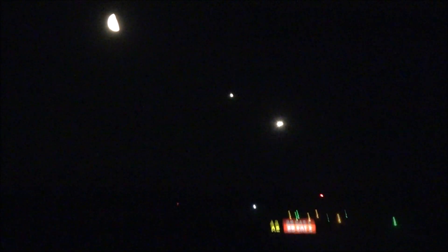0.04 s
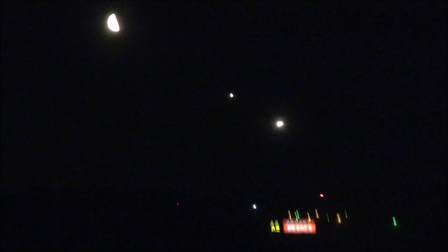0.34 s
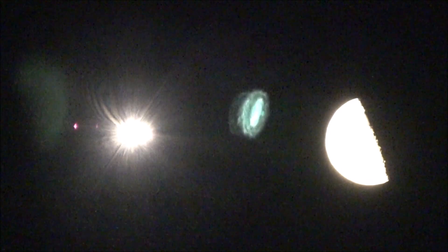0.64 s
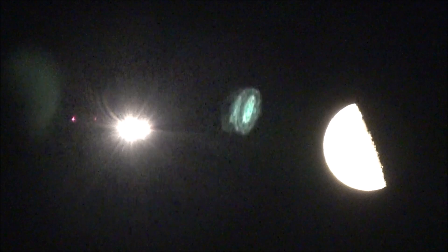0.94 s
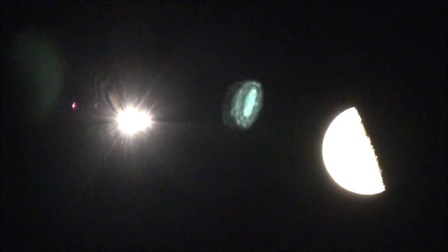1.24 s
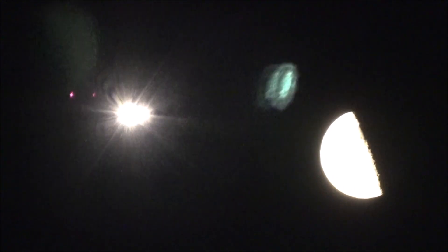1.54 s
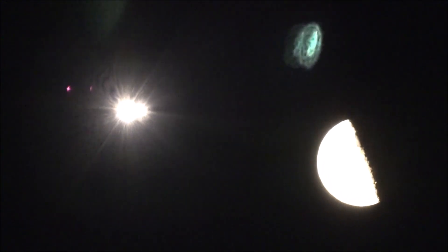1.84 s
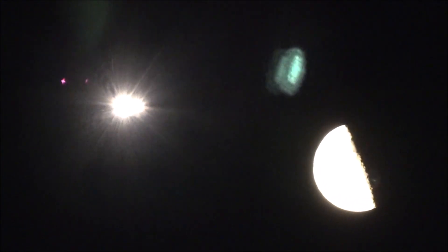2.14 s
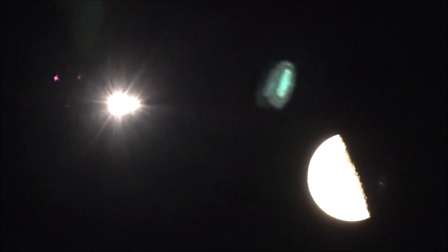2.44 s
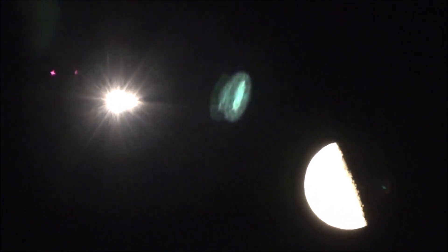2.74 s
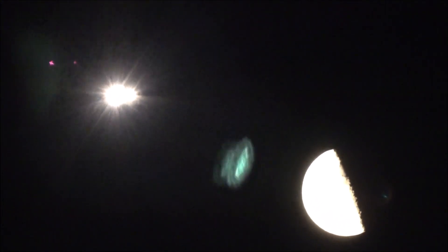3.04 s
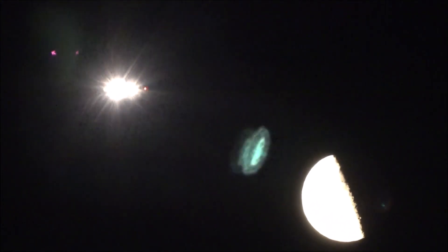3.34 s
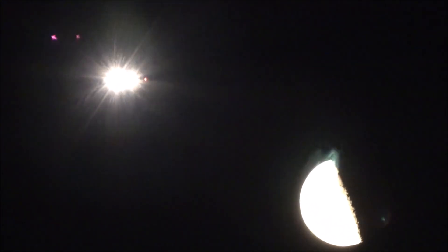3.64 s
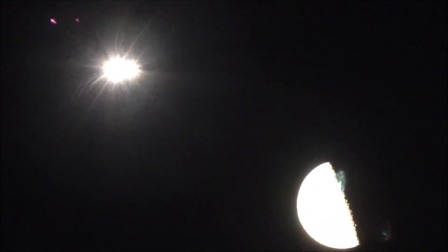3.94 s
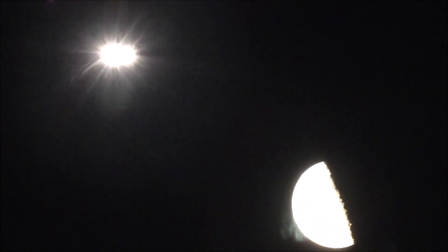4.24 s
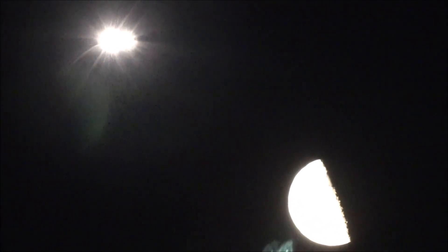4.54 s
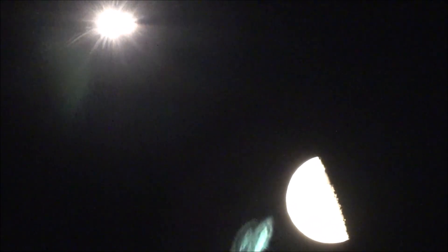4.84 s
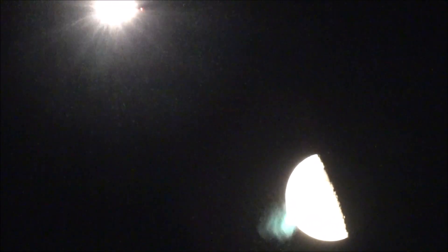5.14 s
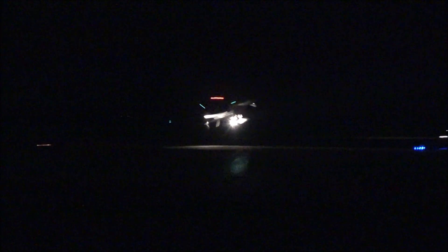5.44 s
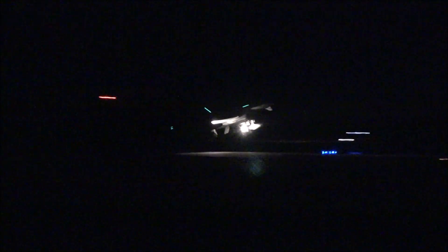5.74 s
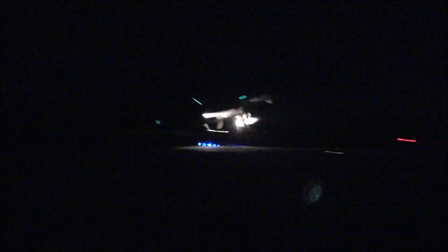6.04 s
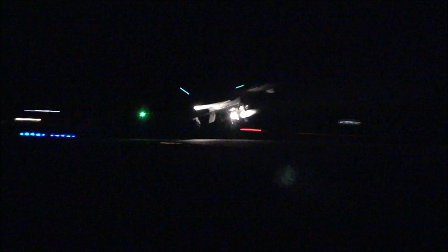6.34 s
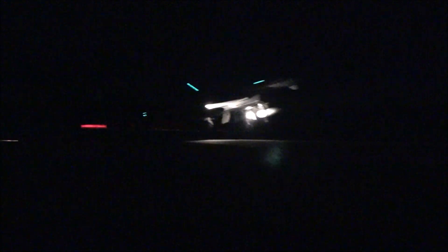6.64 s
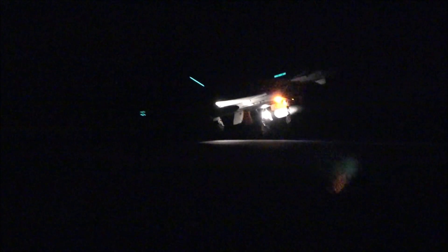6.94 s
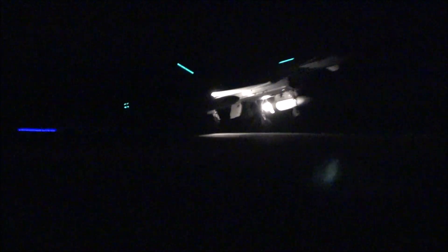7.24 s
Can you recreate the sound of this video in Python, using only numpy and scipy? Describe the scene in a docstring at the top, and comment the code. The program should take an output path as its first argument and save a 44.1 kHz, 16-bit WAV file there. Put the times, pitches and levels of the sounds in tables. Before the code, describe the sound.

A twin-engine fighter jet approaches and rolls past on a runway, its engines screaming with a high whine over rushing air.

```python
"""First comes an instant of far-off rumble, then silence: a twin-engine fighter is landing at night.
From beside the runway we then hear it approach, and jump to it rolling past. The intake fans scream
under a thin blade whine, the exhaust rumbles, and air rushing over the body roars and howls with a
slow beat. An echo off the ground sweeps notches (missing pitches) through the noise, and swirling
air makes the treble surge and flutter."""
import sys
import numpy as np
from scipy import signal
from scipy.fft import rfft, irfft, next_fast_len
from scipy.io import wavfile
from scipy.ndimage import uniform_filter1d, minimum_filter1d, map_coordinates

SR = 44100
rng = np.random.default_rng(int(sys.argv[2]) if len(sys.argv) > 2 else 0)


def master(y):
    """Save y as 16-bit WAV."""
    cut = np.clip(np.atleast_2d(y).T, -1, 1)
    pcm = np.round(cut * 32767)  # scale
    wavfile.write(sys.argv[1], SR, pcm.astype(np.int16))


N = 321048
WINDOW, HOP = 1024, 128  # noise is shaped in short overlapping frames: length, step [samples]
TIME = np.arange(N) / SR
FRAMES = np.arange(-(-N // HOP) + 1) * HOP / SR
HZ = np.fft.rfftfreq(WINDOW, 1 / SR)[:, None]
# when each part is heard (start [s], end [s])
FAR_SPAN, APPROACH_SPAN, ROLL_SPAN = (0, .139), (.4805, 5.285), (5.285, 7.4)

# Table levels are relative: the functions add their own gains.
# tone colour of the microphone hiss and of each jet noise (frequency [Hz], level [dB])
MIC_COLOUR = [(100, -3), (3000, 0), (6500, 0), (10000, -3), (13500, -4), (15000, -8), (16000, -16)]
FAR_COLOUR = [(25, -20), (50, -13), (110, 3), (165, -14), (260, 3.5), (420, -2), (800, -9), (1300, -12.5),
              (1900, -23), (2600, -36), (5000, -58)]
RUMBLE_COLOUR_APPROACH = [(20, -40.5), (45, -25.5), (70, -5.5), (105, 0), (160, 2), (210, -7), (280, -2),
                          (400, -13.5), (700, -29), (2000, -93)]
RUMBLE_COLOUR_ROLL = [(20, -34.5), (45, -16), (85, 5.5), (115, 1.5), (160, -3), (220, -21), (280, -12),
                      (420, -12.5), (700, -25), (2000, -83)]
ROAR_COLOUR_APPROACH = [(200, -27.5), (440, -13.5), (530, -1), (640, 1.5), (750, -1), (1000, -1),
                        (1450, 2.5), (1750, 1), (2300, -6.5), (3200, -35.5), (6000, -100)]
ROAR_COLOUR_ROLL = [(200, -16), (430, -5.5), (520, 2.5), (620, 4), (780, 1.5), (980, 0), (1300, 3.5),
                    (1800, 1.5), (3000, -29), (7000, -83)]
INTAKE_COLOUR_APPROACH = [(1200, -26.5), (2200, -1), (2600, 2.5), (3100, 1.5), (3600, 1), (4000, -7.5),
                          (4500, -12), (5000, -25), (5700, -35.5), (7000, -62), (9000, -110)]
INTAKE_COLOUR_ROLL = [(900, -28), (1800, -9), (2400, 6), (3100, 2.5), (3600, 5), (4300, -1), (5000, -8.5),
                      (6200, -15.5), (7000, -24), (8200, -38), (9500, -57.5), (13000, -81.5)]
# microphone hiss (time [s], level [dB])
MIC_HISS = [(0, -67), (2.6, -66.5), (2.8, -70), (3.3, -74.5), (4.4, -73), (5.2, -71), (5.4, -69),
            (6.05, -68), (6.3, -78), (7.28, -77.5)]
# exhaust rumble (time [s], level [dB])
RUMBLE_APPROACH = [(0.55, -44), (2.45, -45), (3.8, -53.5), (5.14, -47), (5.15, -48.5)]
RUMBLE_ROLL = [(5.32, -43), (6.05, -38.5), (6.302, -50), (7.168, -45.5), (7.25, -50)]
# boom of the open wheel bays (time [s], level [dB])
BOOM_APPROACH = [(0.55, -41), (1.51, -47.5), (1.55, -52.5), (2.84, -38), (3.41, -42), (5.11, -40),
                 (5.2, -42)]
BOOM_ROLL = [(5.32, -43.5), (6.13, -48.5), (6.238, -58.5), (7.25, -59)]
# roar of air over the body (time [s], level [dB])
ROAR_APPROACH = [(0.52, -32.5), (0.85, -31), (1.43, -33), (2.31, -33.5), (2.54, -27), (2.83, -30),
                 (2.91, -27), (3.2, -29), (4.13, -31), (4.36, -34.5), (4.5, -34), (5.07, -33),
                 (5.24, -32.5)]
ROAR_ROLL = [(5.31, -34), (5.502, -41), (5.584, -38.5), (5.792, -37), (6.05, -34.5), (6.464, -49),
             (7.142, -41), (7.164, -40), (7.24, -45)]
# scream of the fans (time [s], level [dB])
FAN_APPROACH = [(0.5, -22), (0.81, -20), (0.97, -28.5), (1.52, -31), (1.56, -33), (1.79, -28), (2.38, -37),
                (2.54, -24.5), (2.76, -31), (2.96, -22.5), (3.31, -28), (3.32, -23.5), (3.76, -34.5),
                (4.75, -21.5), (5.13, -29), (5.28, -24)]
FAN_ROLL = [(5.31, -31), (5.448, -25), (5.502, -32), (5.852, -31.5), (6.072, -24), (6.476, -26),
            (6.702, -35), (6.734, -28), (7.24, -34)]
# intake hiss between surges (time [s], level [dB], treble compared with the hiss [dB])
INTAKE_APPROACH = [(.5, -41.5, -23), (1.35, -44.5, -29.5), (2, -38.5, -26), (3, -37.5, -22.5),
                   (3.8, -41.5, -27.5), (4.4, -42, -15.5), (5.27, -36.5, -17.5)]
INTAKE_ROLL = [(5.299, -33.5, -17.5), (6.2, -30.5, -18.5), (6.7, -34.5, -17.5), (7.28, -29.5, -14)]
# air howls across a hollow in the body; a deeper one hums (time [s], pitch [Hz], level [dB])
HOWL_APPROACH = [(.5, 639.4, -45), (1.05, 633.7, -40.5), (1.9, 641.7, -37), (2.65, 644, -33),
                 (3.95, 643, -32.5), (4.4, 644.6, -42), (5.27, 634, -53)]
HOWL_ROLL = [(5.3, 634, -43), (6, 620, -40.5), (6.3, 604, -61.5), (7.1, 609, -45)]
HUM_APPROACH = [(.5, 354.4, -67.5), (4.1, 353.9, -57.5), (4.55, 349, -43.5), (5.27, 345.5, -44.5)]
# fan blade whine, following the throttle (time [s], pitch [Hz], level [dB])
BLADE_WHINE = [(.5, 3490, -69), (1.1, 3750, -60.5), (2, 3730, -53.5), (2.5, 3664, -58.5), (2.9, 3550, -49),
               (3.6, 3650, -66.5), (4.4, 3540, -58.5), (5.6, 3500, -47.5), (6.15, 3530, -44.5),
               (7.28, 3520, -56)]
# echo off the ground (time [s], lowest notch [Hz], strength [0-1])
GROUND_ECHO = [(.5, 426, 0.09), (1.9, 950, 0), (2.3, 1430, 0.59), (2.55, 2490, 0.07), (3.4, 3010, 0.03),
               (3.75, 2600, 0.38), (4.1, 1750, 0.57), (4.35, 1145, 0.44), (4.55, 786, 0.27),
               (5.2, 706, 0.33), (5.6, 851, 0)]
# hiss surges carried by swirling air (time [s], half-length [s], gain [dB], extra treble [dB])
HISS_SURGES = [(2.643, 0.069, 5.5, -0.5), (2.877, 0.041, 7.5, -2), (3.406, 0.16, 6, -2),
               (4.048, .07, 0.5, 8), (4.245, 0.11, 8, 1), (4.76, 0.12, 4.5, -2.5), (5.028, 0.06, -2, 10),
               (5.416, 0.038, 7, -3.5), (6.075, 0.038, 3.5, 2.5), (6.227, 0.039, 8.5, -1.5),
               (6.315, 0.053, 5.5, 3), (6.452, 0.025, 10, 1.5), (6.575, 0.039, 4, 2),
               (6.841, 0.037, 9, -3.5), (6.96, 0.055, 6, 0), (7.154, 0.042, 4, -3), (7.227, .03, 8, -3)]
# rising bands in the noise, where the ground echo lets the pitches through (time [s], centre [Hz], half-length
# [s], gain [dB])
RISING_SWOOSHES = [(2.294, 2590, 0.11, 8.5), (4.105, 2820, .16, 6.5), (4.85, 2800, 0.12, 3),
                   (5.245, 1950, 0.076, 5.5)]


def amp(db):
    """Turn decibels into a number to multiply by."""
    return 10 ** (np.asarray(db) / 20)


def curves(rows, at=FRAMES):
    """Join a table's points with straight lines: one curve for each column after the time."""
    times, *columns = np.transpose(rows)
    return [np.interp(at, times, column) for column in columns]


def colour(points):
    """Turn a tone colour table into a spectrum: a gain for each frequency."""
    hz, db = np.transpose(points)
    return amp(np.interp(np.log(HZ + 1), np.log(hz), db))


def hump(centre_hz, width_hz, skirt):
    """A broad peak in the spectrum; a smaller skirt makes its sides steeper."""
    detune = (HZ ** 2 - centre_hz ** 2) / (HZ * width_hz + 1)
    return np.exp(-(detune / skirt) ** 2) / (1 + detune ** 2)


def wobble(rate, at=TIME):
    """A smooth curve through `rate` random values a second."""
    return map_coordinates(rng.standard_normal(int(8 * rate) + 4), [at * rate])


def patches(rate, span_hz):
    """Random highs and lows over frequency and time, typically of size 1."""
    grid = rng.standard_normal((int(SR / span_hz) + 4, int(8 * rate) + 4))
    field = map_coordinates(grid, np.broadcast_arrays(HZ / span_hz, FRAMES * rate), order=1)
    return field / np.sqrt(np.mean(field ** 2) + 1e-20)


def at_level(shape, db):
    """Scale a spectrum so that its noise has this level in each frame."""
    return amp(db) * shape / np.sqrt(np.mean(shape ** 2, axis=0) + 1e-20)


def rush(*layers):
    """Rushing noise, shaped by the combined power of these spectra."""
    noise = signal.stft(rng.standard_normal(N), nperseg=WINDOW, noverlap=WINDOW - HOP)[2]
    gain = np.sqrt(sum(layer ** 2 for layer in layers))
    return signal.istft(noise * gain, nperseg=WINDOW, noverlap=WINDOW - HOP)[1][:N]


def gate(start, end, fade_s=.0002):
    """Let sound through only between start and end."""
    return np.clip(np.minimum(TIME - start, end - TIME) / fade_s + .5, 0, 1)


def microphone_hiss(side_db=-20):
    """A faint hiss, nearly the same left and right."""
    hiss = at_level(colour(MIC_COLOUR), curves(MIC_HISS)[0])
    mid, side = rush(hiss), amp(side_db) * rush(hiss)
    return np.array([mid + side, mid - side])


def distant_jet():
    """The dull, steady rumble of the aircraft far away."""
    return rush(at_level(colour(FAR_COLOUR), db=-43.5))


def ground_echo(scatter_hz=5500):
    """A late echo off the ground cancels some pitches; rough ground scatters the echo's treble."""
    notch_hz, strength = curves(GROUND_ECHO)
    echo = strength * np.exp(1j * np.pi * HZ / notch_hz) / (1 + (HZ / scatter_hz) ** 4)
    return np.abs(1 + echo)


def surges():
    """Swirling air brings the hiss in smooth swells: a level curve and a treble curve, in dB."""
    time, half_length, gain_db, treble_db = np.transpose(HISS_SURGES)
    swells = np.exp(-((FRAMES[:, None] - time) / half_length) ** 2)
    return swells @ gain_db, swells @ treble_db


def swooshes(climb_hz_per_s=3500, half_width_hz=300):
    """Narrow bands swell and fade as they climb in pitch: a boost in dB."""
    boost_db = 0
    for time, centre_hz, half_length, gain_db in RISING_SWOOSHES:
        elapsed = FRAMES - time
        away_hz = HZ - centre_hz - climb_hz_per_s * elapsed
        boost_db += gain_db * np.exp(-(elapsed / half_length) ** 2 - (away_hz / half_width_hz) ** 2)
    return boost_db


def beat(peak_s=2.573, period_s=.691, depth=.47):
    """The slow swelling and sinking made by two whistles of nearly the same pitch."""
    return np.abs(1 + depth * np.exp(2j * np.pi * (TIME - peak_s) / period_s))


def whistle(rows, drift_hz, drift_rate, flutter_db, gain_db):
    """The tone of a hollow or of fan blades; its pitch and strength waver on the way."""
    hz, db = curves(rows, TIME)
    phase = 2 * np.pi * np.cumsum(hz + drift_hz * wobble(drift_rate)) / SR
    return np.sqrt(2) * amp(db + gain_db + flutter_db * wobble(18)) * np.sin(phase)


def exhaust_and_bays(rumble_rows, boom_rows, rumble_colour, rumble_db, boom_db, boom_hz, boom_width_hz):
    """The exhaust rumbles low, and air booms in the open wheel bays."""
    (rumble,), (boom,) = curves(rumble_rows), curves(boom_rows)
    exhaust = at_level(colour(rumble_colour), rumble + rumble_db)
    bays = at_level(hump(boom_hz, boom_width_hz, skirt=15), boom + boom_db)
    return rush(exhaust, bays)


def fan_scream(width_hz, start_hz=2086, sink_from_s=5.35, sink_hz_per_s=285):
    """The fans' broad peak holds its pitch, then sinks as the aircraft draws level."""
    centre_hz = start_hz - sink_hz_per_s * np.maximum(FRAMES - sink_from_s, 0)
    return hump(centre_hz, width_hz, skirt=3.8)


def jet(roar_rows, fan_rows, intake_rows, roar_colour, intake_colour, roar_db, fan_db,
        fan_surge, fan_width_hz, treble_hz, usual_treble_db, patchy_db, flutter_db):
    """Body roar, fan scream and intake hiss, carried over the ground through swirling air."""
    (roar,), (fan,), (hiss, treble) = curves(roar_rows), curves(fan_rows), curves(intake_rows)
    surge_db, surge_treble_db = surges()
    notches = ground_echo()
    # air soaks up high pitches much more than low ones
    clearness = amp((treble + surge_treble_db - usual_treble_db) * np.minimum(HZ / treble_hz, 1.5) ** 2)
    body = at_level(colour(roar_colour) * notches, roar + roar_db)
    fans = at_level(fan_scream(fan_width_hz) * notches, fan + fan_db + fan_surge * surge_db)
    intake = at_level(colour(intake_colour) * clearness * notches, hiss + surge_db)
    # swirls of air focus and scatter high pitches most
    swirls_db = patchy_db * patches(rate=16, span_hz=330) + flutter_db * wobble(32, FRAMES)
    flicker = amp(swooshes() + swirls_db * np.sqrt(np.minimum(HZ, 2600) / 2000))
    return rush(body * flicker, fans * flicker, intake * flicker)


def scene():
    """The aircraft far off, approaching and rolling past, always midway between left and right."""
    far = distant_jet()

    approach = jet(ROAR_APPROACH, FAN_APPROACH, INTAKE_APPROACH,
                   ROAR_COLOUR_APPROACH, INTAKE_COLOUR_APPROACH,
                   roar_db=3, fan_db=-1.5, fan_surge=-.12, fan_width_hz=540,
                   treble_hz=3040, usual_treble_db=-20.5, patchy_db=1.58, flutter_db=.5)
    approach += exhaust_and_bays(RUMBLE_APPROACH, BOOM_APPROACH, RUMBLE_COLOUR_APPROACH,
                                 rumble_db=4, boom_db=-1, boom_hz=338.4, boom_width_hz=160)
    approach += beat() * whistle(HOWL_APPROACH, drift_hz=2.6, drift_rate=40, flutter_db=1.2, gain_db=-.2)
    approach += whistle(HUM_APPROACH, drift_hz=14, drift_rate=46, flutter_db=3.5, gain_db=-1)

    roll = jet(ROAR_ROLL, FAN_ROLL, INTAKE_ROLL, ROAR_COLOUR_ROLL, INTAKE_COLOUR_ROLL,
               roar_db=3.5, fan_db=.65, fan_surge=.1, fan_width_hz=665,
               treble_hz=4000, usual_treble_db=-18.5, patchy_db=1.97, flutter_db=1.13)
    roll += exhaust_and_bays(RUMBLE_ROLL, BOOM_ROLL, RUMBLE_COLOUR_ROLL,
                             rumble_db=2, boom_db=0, boom_hz=318, boom_width_hz=220)
    roll += whistle(HOWL_ROLL, drift_hz=13.1, drift_rate=60, flutter_db=1.5, gain_db=-1)

    whine = whistle(BLADE_WHINE, drift_hz=31.7, drift_rate=160, flutter_db=.5, gain_db=1)
    hiss = microphone_hiss()
    balance = amp([[.04], [-.04]])  # the left microphone is a shade more sensitive
    parts = [(FAR_SPAN, far), (APPROACH_SPAN, approach + whine), (ROLL_SPAN, roll + whine)]
    return balance * sum(gate(*span) * (sound + hiss) for span, sound in parts)


def record(dry):
    """A limiter turns the loudest peaks down, then a steep filter removes the very highest treble."""
    ceiling, top_hz = .33, 16100
    needed_gain = np.minimum(1, ceiling / (np.abs(dry).max(axis=0) + 1e-9))
    smooth_gain = uniform_filter1d(minimum_filter1d(needed_gain, size=601), size=301)
    size = next_fast_len(N + SR // 2)
    hz = np.fft.rfftfreq(size, 1 / SR)
    spectrum = rfft(dry * smooth_gain, size) / (1 + (hz / top_hz) ** 200)
    return irfft(spectrum, size)[:, :N]


dry = scene()
out = record(dry)
master(out)
```